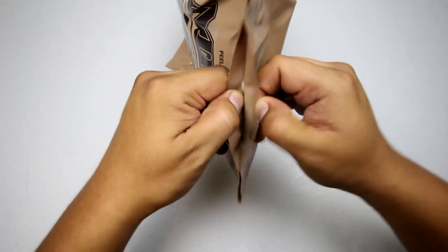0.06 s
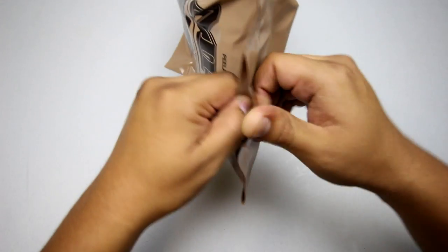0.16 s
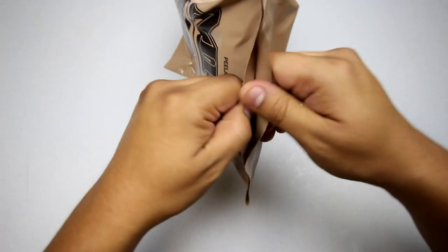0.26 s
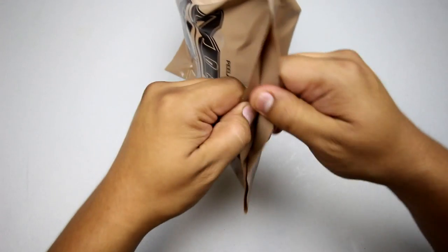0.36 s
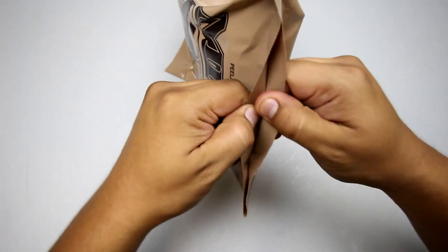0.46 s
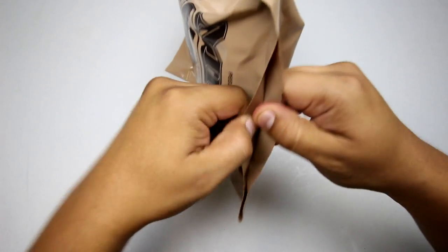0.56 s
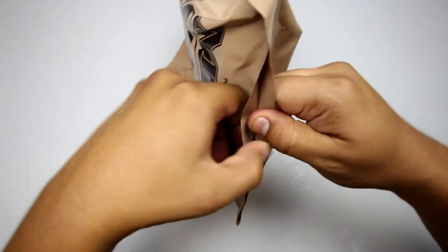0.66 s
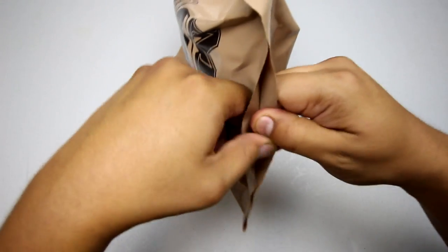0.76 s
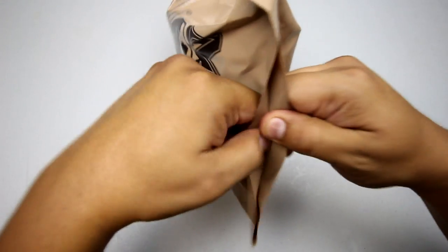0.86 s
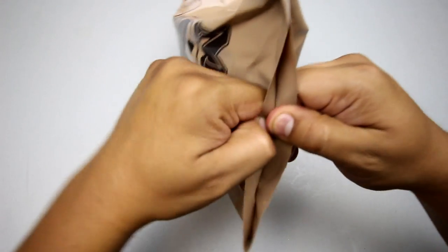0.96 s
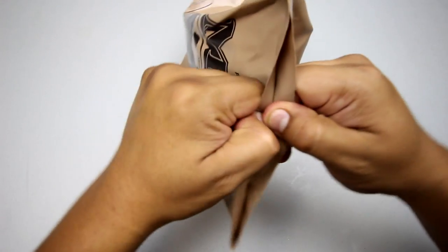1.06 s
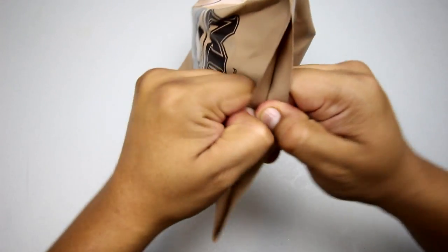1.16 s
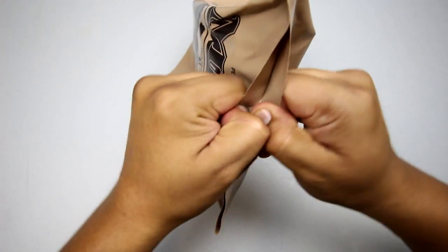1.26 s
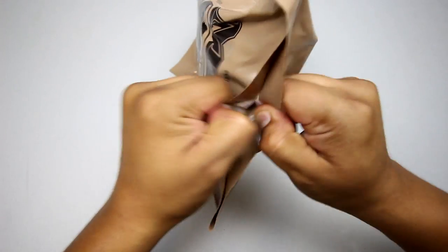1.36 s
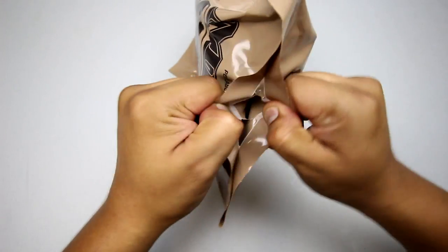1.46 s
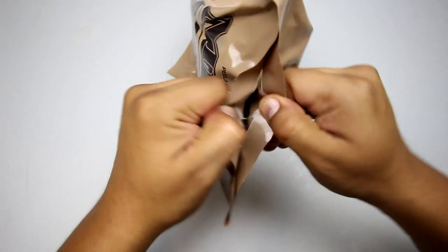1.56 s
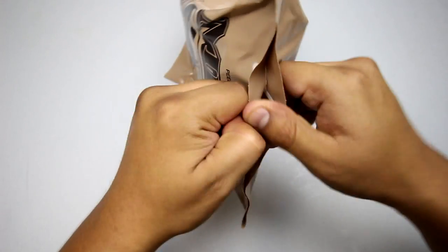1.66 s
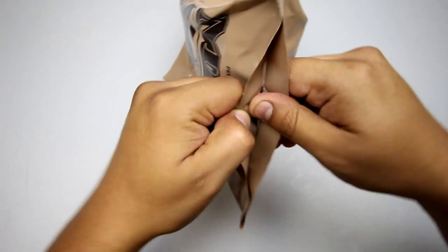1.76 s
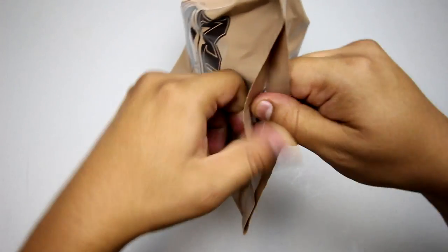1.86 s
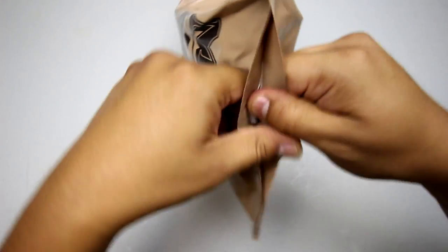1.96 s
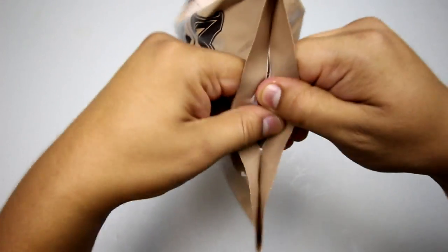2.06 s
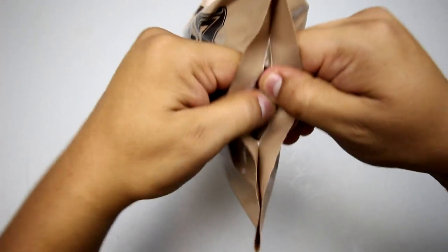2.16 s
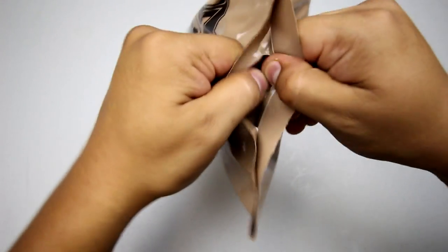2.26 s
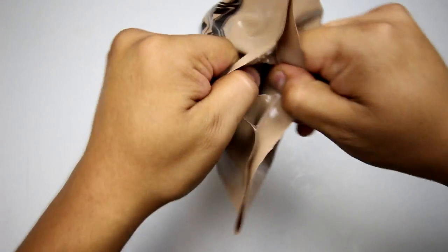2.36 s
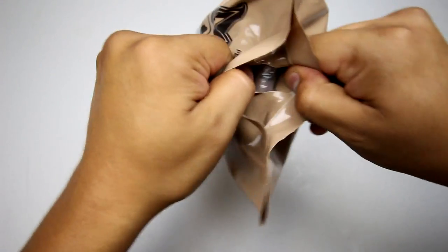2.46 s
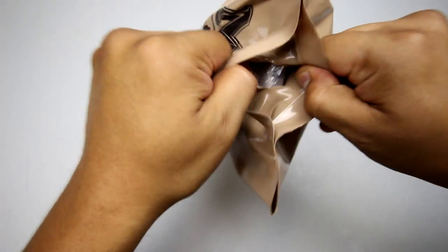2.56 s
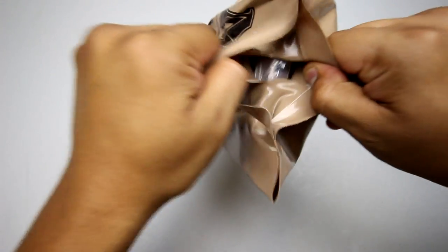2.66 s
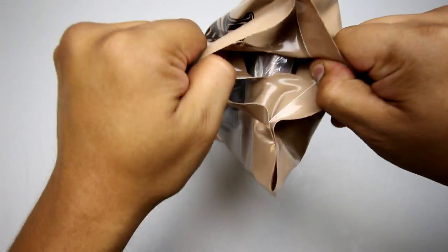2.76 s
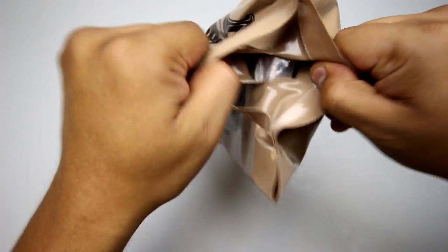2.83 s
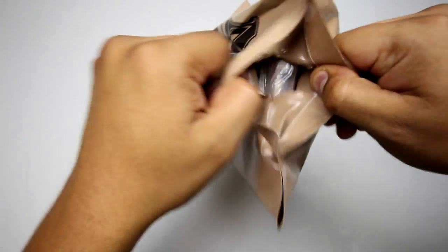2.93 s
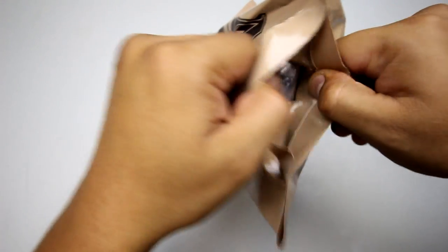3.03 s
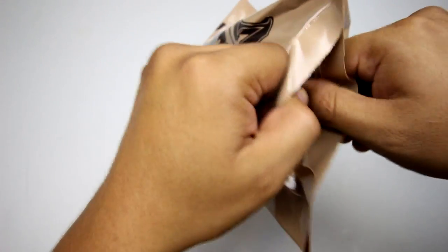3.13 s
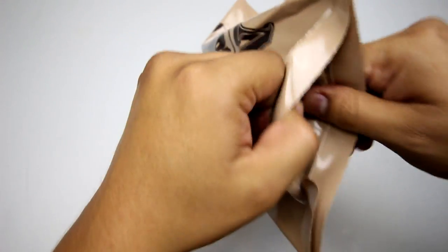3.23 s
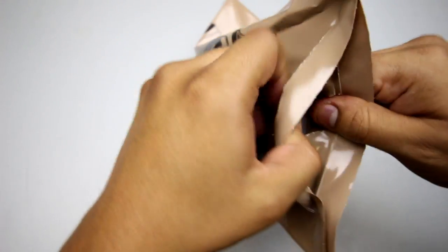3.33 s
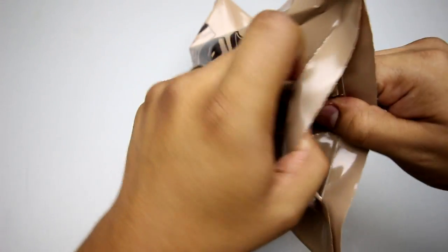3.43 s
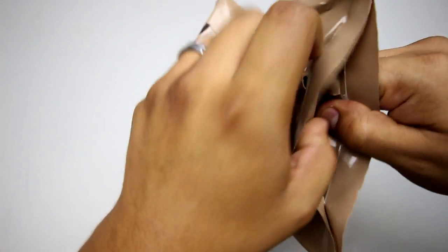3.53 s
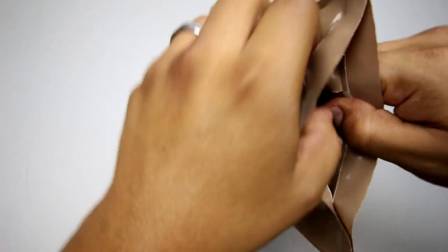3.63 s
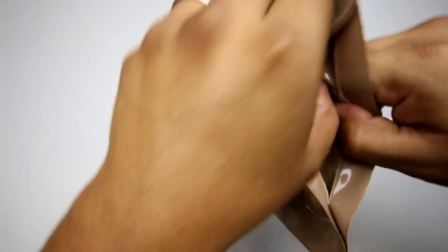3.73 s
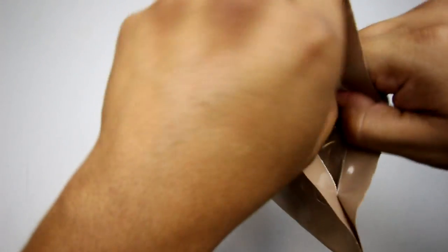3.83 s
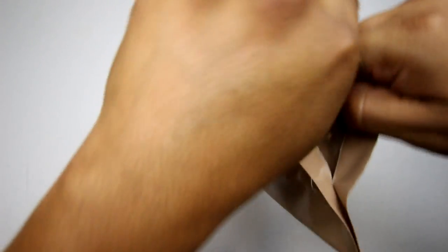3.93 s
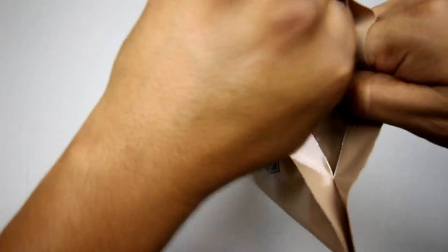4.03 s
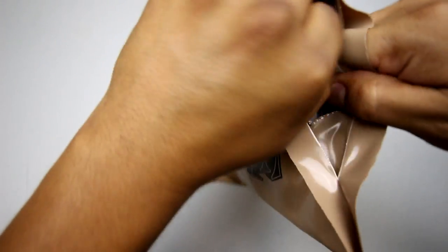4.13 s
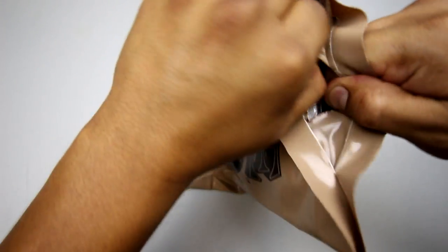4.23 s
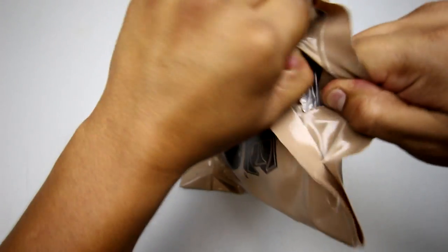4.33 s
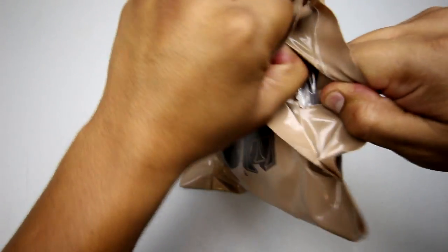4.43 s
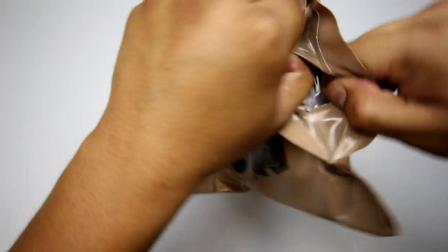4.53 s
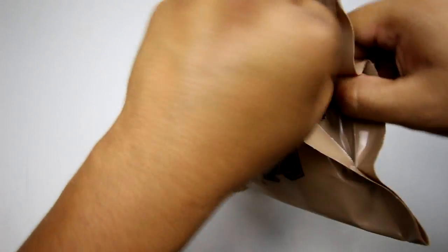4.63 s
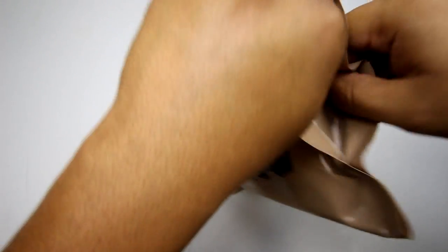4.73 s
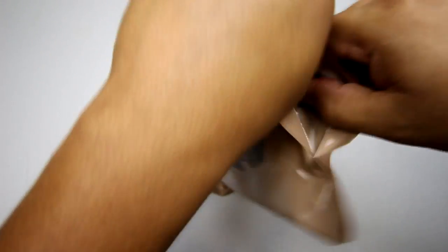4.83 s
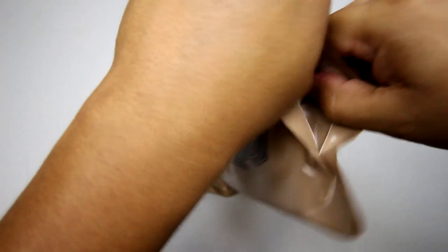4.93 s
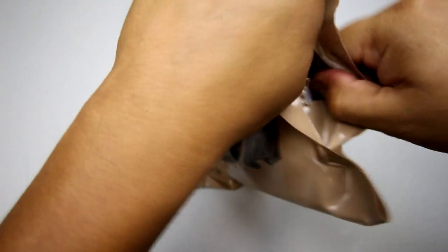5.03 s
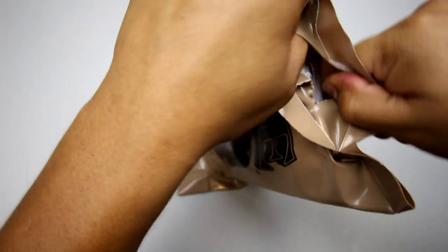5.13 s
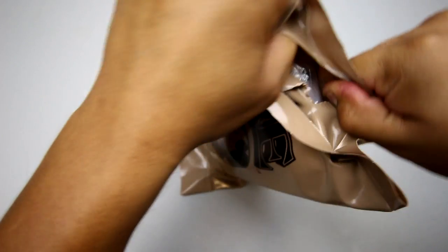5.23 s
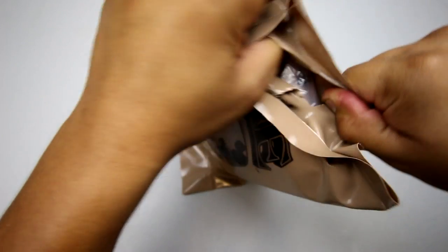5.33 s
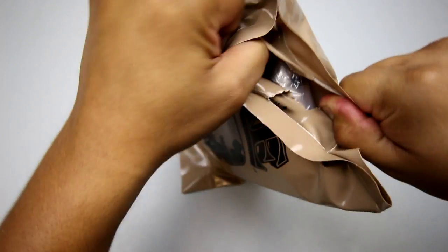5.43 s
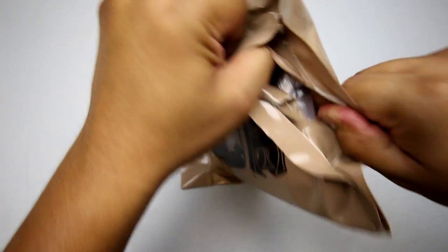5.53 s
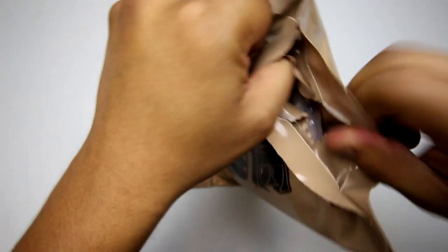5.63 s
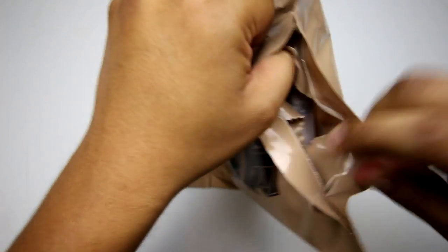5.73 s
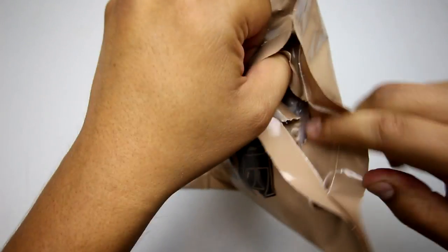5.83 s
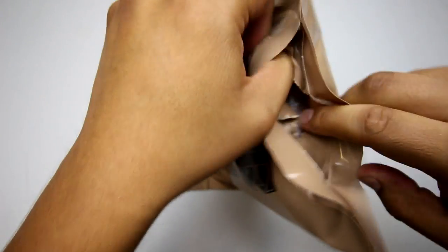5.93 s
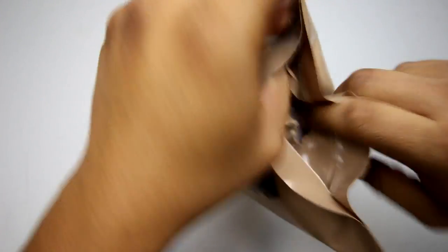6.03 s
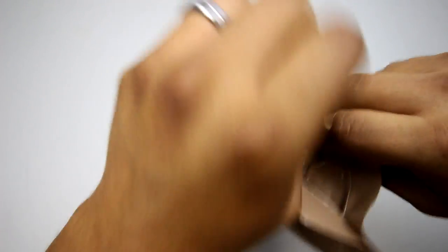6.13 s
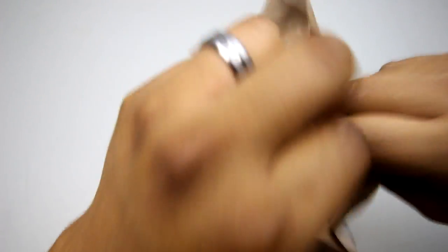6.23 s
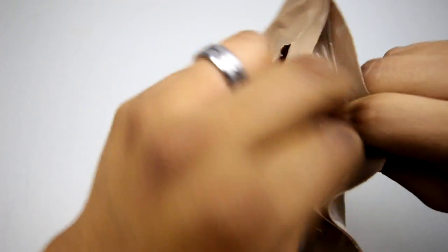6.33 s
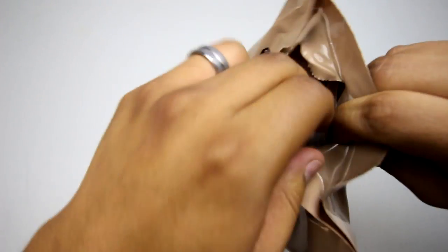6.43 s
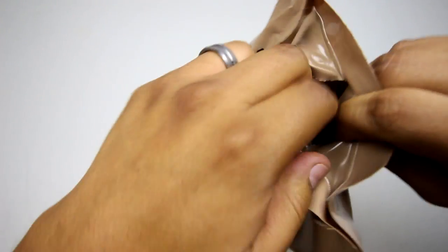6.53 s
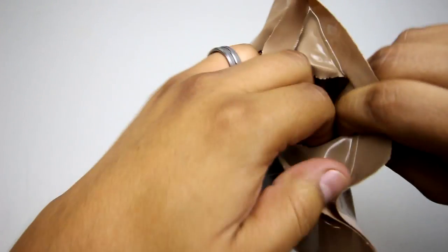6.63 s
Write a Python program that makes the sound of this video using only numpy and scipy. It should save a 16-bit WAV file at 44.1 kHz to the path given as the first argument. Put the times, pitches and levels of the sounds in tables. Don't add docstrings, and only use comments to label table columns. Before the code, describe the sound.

Close stereo handling of heavy crinkly film indoors: irregular bright cracks and duller popping folds, each short and dry with a quick hard-room echo. Snaps thicken after one second, come in isolated loud bursts through the middle, then turn into busy crumpling and rustling near the end. Low soft knocks from fingers, faint handling rumble and slight hiss lie beneath, leaning a little right.

```python
import sys
import numpy as np
from scipy import signal
from scipy.fft import rfft, irfft, next_fast_len
from scipy.io import wavfile
from scipy.ndimage import map_coordinates

SR = 44100
rng = np.random.default_rng(int(sys.argv[2]) if len(sys.argv) > 2 else 0)


def transcribe(u):
    v = np.clip(np.atleast_2d(u).T, -1, 1)
    q = np.round(v * 32767).astype(np.int16)
    wavfile.write(sys.argv[1], SR, q)


def voltage_ratio(level):
    return 10 ** (np.asarray(level, float) / 20)


N = 294588

# start in seconds, peak in dB, crease pitch in Hz,
# panel thump in dB.
FOLDS = [(0.097, -15, 1020, -3), (0.453, -22.5, 1670, -8), (0.49, -23, 820, -17), (0.694, -16, 950, -3),
         (1.09, -1.5, 985, -19), (1.363, -11, 1980, -22), (1.47, -1, 1150, -36), (1.498, 3.5, 1550, -35),
         (1.584, -4, 1530, -7.5), (1.87, -40.5, 921, 22), (1.894, -40, 834, 10), (2.771, 0, 1160, -11),
         (2.82, -11.5, 1050, -18), (3.055, -13.5, 1470, -16), (3.089, -14.5, 1980, -35),
         (3.334, -33, 730, -5), (3.723, -15, 1160, -2.5), (3.82, -3.5, 1090, -14.5), (4.728, -18, 980, -1),
         (4.807, -44, 845, 11), (4.857, 5.5, 1340, -26), (4.942, -10, 900, -25), (4.98, -19.5, 1390, -11),
         (5.179, 5, 1630, -19), (5.218, -11.5, 854, -7), (5.609, -9, 870, -20), (6.21, -16.5, 864, -7.5),
         (6.261, -11, 1560, -38)]
FOLD_SEAM_DB, FOLD_CRACK_DB, FOLD_EDGE_GROWS = -20.5, -30.5, 0.75

# start in seconds, peak in dB, crease pitch in Hz,
# panel thump in dB, seam in dB.
SEAMS = [(0.653, -26.5, 1910, -29, 2), (0.977, -20, 1490, -22, 5), (1.298, -22, 1100, -27, -4),
         (1.373, -11.5, 1520, -14, 8), (1.454, -6.5, 730, -13, 8), (1.464, -1.5, 910, -10, 0.5),
         (2.109, -19, 1470, 3.5, 4), (2.235, -21.5, 1200, -21, -1.5), (2.428, 8.5, 1260, -29.5, -11),
         (2.653, -3, 1000, -8, 6.5), (3.126, -35, 1380, 4, 8), (4.238, -27, 824, -24, 5),
         (4.371, -21.5, 1220, -39, -5), (4.489, 0, 990, -7, -2.5), (4.69, -29, 929, -10, 11.5),
         (5.489, -21, 895, -4.5, 12), (5.592, 1, 920, -19, -15.5), (5.719, -17.5, 860, -15, -8),
         (5.871, -24, 964, -12, 6), (5.999, -26, 810, 1, 4), (6.054, -8.5, 910, -11.5, -1),
         (6.143, -11, 980, -11, -4.5), (6.278, -10, 1060, -39, -14), (6.62, -8.5, 1880, -16, -2.5)]
SEAM_CRACK_DB = -50

# start in seconds, peak in dB, crease pitch in Hz,
# panel thump in dB, crack in dB.
KINKS = [(0.138, -10, 1050, -5, -10), (0.969, -8.5, 1820, -14, -4), (1.491, -5, 1300, -20, -5),
         (1.665, 1.5, 1020, -14, -7), (1.936, -12, 980, -9, -4), (2.029, -3.5, 1370, -12, 0.5),
         (2.092, -3, 1300, -21, 1), (2.153, -5.5, 1180, -15.5, -8), (2.391, -11.5, 1000, -23, -2.5),
         (2.501, -1.5, 900, -17.5, -5.5), (2.754, -7, 1350, -13, -5), (3.169, -10.5, 1470, -12, -3),
         (3.572, -14, 1530, -18, -8), (4.042, -5, 1640, -24, -4), (5.318, -15.5, 1310, -31, -22),
         (5.46, -12.5, 1660, -19.5, 1), (5.943, -13, 1460, -33, -0.5), (6.089, -9, 1160, -14, -0.5),
         (6.219, -15, 1550, -17, -1)]
KINK_SEAM_DB = -2.5

# start in seconds, peak in dB, seam in dB, crack in dB.
CRINKLES = [(0.677, -20, -22, 3), (0.813, -30, -25, -2), (0.924, -26, 14.5, 21.5), (1.036, -21, 9.5, 8),
            (1.322, -15, -10, -2.5), (1.418, -20, 8, -3), (1.837, -19.5, -2.5, -21), (2.295, -68.5, 7, 49),
            (2.372, -23.5, 4, 1), (2.924, -21.5, 8, 3.5), (2.993, -14.5, -1.5, 6), (3.255, -21, 4, 11.5),
            (3.363, -14.5, 0, 5), (3.429, -26.5, 4.5, 2), (3.46, -20.5, -1, 11.5), (3.667, -30, -12, -4),
            (3.696, -20, -5, -7), (3.796, -21.5, -2, -12), (3.993, -32.5, 8, 9.5), (4.088, -19.5, 1, 2),
            (4.215, -27.5, 8.5, 11), (4.434, -35, 6, 11), (5.005, -23.5, 3.5, 7.5),
            (5.391, -25.5, -6, 15.5), (5.439, -46, -6, -9), (6.022, -12.5, -5, 1), (6.045, -14.5, 7.5, 6.5),
            (6.544, -16, 1.5, -12), (6.6, -19.5, -7, 0), (6.671, -14.5, 5, 4)]
CRINKLE_HZ, CRINKLE_THUMP_DB = 1150, -12

# start in seconds, rip time in seconds.
RIPS = [(0.924, 0.0014), (0.969, .005), (1.036, 0.0044), (1.373, 0.0028), (1.419, 0.0079), (1.455, 0.005),
        (1.491, 0.0058), (2.373, 0.012), (2.501, 0.0025), (2.653, 0.0022), (3.169, 0.0041), (3.255, 0.0058),
        (3.572, 0.0045), (4.042, .003), (5.46, 0.0038), (5.489, 0.0033), (6.054, 0.0034)]
RIP_S = 0.0008

# start in seconds, peak in dB, pitch in Hz.
BELLY = [(0.097, -16.5, 420), (0.137, -10, 406), (0.69, -27, 310), (1.462, -1.5, 614), (1.584, -4, 415),
         (1.662, -3.5, 326), (2.09, -10.5, 580), (2.426, -14.5, 475), (2.5, -9, 501), (2.654, -12, 510),
         (2.769, -7.5, 414), (3.724, -9, 343), (3.819, -9.5, 504), (4.49, -5, 323), (5.215, -19, 415),
         (5.591, -17, 490), (6.048, -14, 233)]
FACE = [(1.09, -6, 1400), (1.464, -12, 1100), (1.496, -12, 1270), (1.583, -3, 1410), (1.662, -3, 1140),
        (1.937, -14, 896), (2.031, -9, 1210), (2.091, -11, 1250), (2.428, -1, 1180), (2.501, -21, 825),
        (2.653, -9, 815), (2.77, -0.5, 1220), (3.82, -8, 1260), (4.043, -20, 1460), (4.489, -7.5, 830),
        (4.859, -2, 1500), (5.182, -7, 1050), (5.594, -5, 910)]
GUSSET = [(1.0887, -6, 1660), (1.373, -15, 2840), (1.4561, -9, 3660), (1.662, -2, 1600), (2.0287, -7, 2270),
          (2.4287, 0, 1600), (2.654, 4, 3420), (3.1667, -14, 1650), (3.361, -1, 2320), (3.461, -8, 3830),
          (4.0397, -12.5, 1670), (4.4898, -2, 2550), (4.856, -13, 1570), (5.1786, 9, 1880),
          (5.488, -9, 3020), (5.5922, -5, 1710), (6.0467, -4, 1830)]

# start in seconds, peak in dB, pitch in Hz.
FLECKS = [(.344, -37, 4500), (.475, -24, 3040), (.63, -33, 4000), (1.013, -26, 8000), (1.207, -24, 3900),
          (1.24, -34, 4000), (2.143, -14, 4000), (2.497, 2, 2470), (2.59, -28, 7500), (2.618, -25, 8000),
          (3.044, -26, 3000), (3.134, -18, 2800), (3.171, -7, 4600), (3.303, -30, 6000), (3.375, -22, 2500),
          (3.49, -31, 5000), (3.642, -31, 5000), (3.971, -22, 4000), (4.466, -33, 6000), (4.623, -26, 4000),
          (4.871, -28, 8000), (4.894, -24, 7500), (4.911, -30, 9000), (5.356, -27.5, 3100),
          (5.441, -17, 5770), (5.493, -9, 3500), (5.499, -20, 1300), (5.532, -40, 8500), (5.576, -29, 4500),
          (6.585, -30, 5000)]

# start in seconds, peak in dB.
TICKS = [(0.1677, -13), (0.9614, -31), (0.977, -24), (0.998, -12), (1.0054, -26), (1.0314, -31),
         (1.381, -8), (1.667, -7), (2.034, -30), (2.295, -19), (2.484, -32), (2.6389, -38), (2.9766, -49),
         (3.353, -19), (3.5671, -16), (4.3, -25), (4.3974, -21), (4.7, -13), (4.808, -18), (5.2533, -16),
         (5.274, -10.5), (5.413, -19), (5.874, -17), (6.0274, -23), (6.081, -4.5), (6.323, -12),
         (6.3844, -24), (6.4674, -14), (6.606, -6.5)]

# time in seconds, pull in dB, twist in dB.
PULL = [(0, -39, -43.5), (.72, -46.5, -47), (.92, -22.5, -41), (1.1, -35.5, -47), (1.9, -38.5, -38.5),
        (2.2, -32, -29), (2.39, -46, -50), (2.75, -29, -44), (3.5, -37.5, -42.5), (3.8, -31, -35.5),
        (3.92, -43, -51), (4.18, -31, -33.5), (4.45, -38.5, -47.5), (4.69, -30.5, -35), (5.5, -39, -41),
        (5.85, -32, -35), (6.35, -26, -31), (6.68, -34, -35.5)]
SETTLE_DB, SETTLE_RISE_S, SETTLE_S = -23.5, 0.1, 0.062
FIZZ_DB, FIZZ_GROWS = -45.5, 0.66
FLAP_DB, FLAP_GROWS, FLAP_GRIP_DB = -47, 0.77, 1.5

# frequency in Hz, level in dB per Hz.
RUSTLE = [(180, -31), (300, 0), (410, -1.5), (487, -0.5), (538, -5.5), (629, -1.5), (1630, -0.5),
          (9000, -21), (11700, -33), (19800, -120)]
FIZZ = [(2650, -6), (4500, -6.5), (9770, -6), (14700, -7.5), (15700, -28), (16300, -37)]
FLAP = [(53, -42), (90, -2.5), (297, 3), (358, -2.5), (575, 4), (700, -57), (910, -28), (1540, -120)]

# middle in seconds, half length in seconds, level in dB, centre in Hz.
CRUMPLES = [(0.09, 0.042, -38, 1510), (0.196, 0.027, -30.5, 3500), (0.356, 0.029, -36.5, 4600),
            (0.464, 0.031, -32.5, 2330), (0.665, 0.023, -33, 2500), (0.906, 0.059, -32, 1830),
            (1.43, 0.012, -25, 3500), (2.546, 0.0055, -26, 5960), (2.994, 0.013, -43, 2500),
            (3.815, 0.057, -33, 6000), (4.02, 0.047, -32, 3500), (4.632, 0.06, -28.5, 2660),
            (4.703, 0.011, -24.5, 9000), (4.912, 0.024, -33, 8000), (5.055, 0.042, -34, 2950),
            (5.672, 0.012, -27.5, 2470), (5.724, 0.045, -33, 3900), (5.831, 0.093, -31, 2450),
            (5.777, 0.0092, -23, 3020), (6.048, 0.013, -19, 2440), (6.262, 0.038, -24, 3070),
            (6.325, 0.032, -20, 3100), (6.423, 0.088, -33.5, 2500), (6.627, 0.017, -28, 7000)]

# start in seconds, peak in dB, pitch in Hz.
KNOCKS = [(0.157, -27, 133), (0.687, -30, 194), (.83, -35, 138), (0.966, -27, 139), (1.006, -28, 160),
          (1.089, -23.5, 181), (1.33, -35, 130), (1.471, -19, 173), (1.664, -21, 141), (2.031, -34, 151),
          (2.147, -27, 134), (2.663, -18.5, 180), (2.772, -13, 256), (3.018, -27, 173), (3.038, -29, 110),
          (3.125, -22.5, 234), (3.173, -22, 142), (4.129, -29, 262), (4.216, -24.5, 240),
          (4.491, -9.5, 325), (4.646, -19.5, 236), (4.727, -30.5, 167), (5.1, -26.5, 161),
          (5.146, -21.5, 176), (5.595, -22.5, 189), (6.045, -17, 202)]

# middle in seconds, half length in seconds, rumble in dB.
GRIPS = [(.11, 0.077, -45), (0.944, 0.093, -39), (1.46, 0.12, -40.5), (2.087, 0.13, -46),
         (2.504, 0.024, -45), (3.096, 0.16, -44.5), (4.75, 0.13, -50), (5.143, 0.066, -41),
         (5.787, 0.026, -38.5), (6.3, 0.33, -55)]

# frequency in Hz, level in dB per Hz.
RUMBLE = [(8.8, -38), (15, -60), (43, 11.5), (87, -8), (130, 10), (170, 5.5), (290, -120)]
ROOM_RUMBLE_DB = -54.5

# time in seconds, left level over right in dB.
PLACE = [
    (0.0, -3),
    (2.77, -3.5),
    (3.37, -4.5),
    (5.19, -3),
    (5.86, -4.5),
    (6.68, -4.5),
]
LEFT_DB = -3

# frequency in Hz, likeness from 0 to 1.
ALIKE = [(60, 0.79), (180, 0.62), (550, 0.91), (1650, 0.77), (4970, 0.13), (15000, 0.021)]

# frequency in Hz, time to fall by 60 dB in seconds.
ROOM = [(150, 0.15), (500, 0.35), (2000, 0.24), (5000, 0.38), (12000, 0.19)]

# delay in seconds, level in dB.
TABLE = [
    (.0021, -11),
    (.0036, -13),
    (0.0145, -19),
]
SHUDDER_DB, WET_DB = -9.5, -4.5
HISS_DB = -68


def snaps():
    s, db, hz, thump_db, seam_db, crack_db = creases()
    scatter = rng.standard_normal((len(s), 4))
    panel_hz = 330 * np.exp(0.24 * scatter[:, 0])
    seam_hz = 3100 * np.exp(0.016 * scatter[:, 1])
    crack_hz = 6800 * np.exp(0.37 * scatter[:, 2])
    panel = voltage_ratio(db + thump_db + 2.0)[:, None] * bursts(panel_hz, q=1.12)
    fold = voltage_ratio(db + 0.5)[:, None] * bursts(hz, q=0.93)
    seam = voltage_ratio(db + seam_db + 5.5)[:, None] * bursts(seam_hz, q=1.22)
    crack = voltage_ratio(db + crack_db + 5.5)[:, None] * bursts(crack_hz, q=0.77)
    edge = ripped(s, seam - crack)
    return place(s, panel - fold + edge, 0.18 * scatter[:, 3], count=8)


def creases():
    slower = FOLD_EDGE_GROWS - 1
    rows = []
    for s, db, hz, thump in FOLDS:
        rows.append((s, db, hz, thump, FOLD_SEAM_DB + slower * db, FOLD_CRACK_DB + slower * db))
    for s, db, hz, thump, seam in SEAMS:
        rows.append((s, db, hz, thump, seam, seam + SEAM_CRACK_DB))
    for s, db, hz, thump, crack in KINKS:
        rows.append((s, db, hz, thump, crack + KINK_SEAM_DB, crack))
    for s, db, seam, crack in CRINKLES:
        rows.append((s, db, CRINKLE_HZ, CRINKLE_THUMP_DB, seam, crack))
    return np.transpose(sorted(rows))


def ripped(s, rows):
    rip_s = np.full(len(s), RIP_S)
    for when, length_s in RIPS:
        nearest = np.abs(s - when).argmin()
        rip_s[nearest] = length_s
    fade = np.exp(-np.arange(2048) / SR / rip_s[:, None])
    slips = rng.standard_normal(rows.shape) ** 3 * fade
    slips[:, 0] = 22
    slips /= np.linalg.norm(slips, axis=1, keepdims=True)
    return signal.fftconvolve(rows, slips, axes=1)[:, :2048]


def taut_faces():
    belly = tuned(BELLY, under_db=-6, q=3.38)
    face = tuned(FACE, under_db=-6.5, q=6)
    gusset = tuned(GUSSET, under_db=-14.5, q=6.8)
    return belly - face - gusset


def flecks():
    return tuned(FLECKS, under_db=-5.5, q=3.0)


def pops(count):
    draw = rng.random((count, 3))
    when = draw[:, 0] * (N / SR - 0.01)
    pull_db = effort()[(when * SR).astype(int)]
    db = pull_db + 1.5 + 9 * draw[:, 1] ** 2
    hz = 900 * 9 ** draw[:, 2]
    return place(when, voltage_ratio(db)[:, None] * bursts(hz, q=1.7), np.zeros(count), count=8)


def ticks():
    s, db = np.transpose(TICKS)
    scatter = rng.standard_normal((len(s), 2))
    hz = 9000 * np.exp(0.084 * scatter[:, 0])
    rows = voltage_ratio(db + 1.0)[:, None] * bursts(hz, q=1.47)
    return place(s, rows, 3.9 * scatter[:, 1], count=8)


def film():
    twist_db = curves(PULL)[1]
    twist_db = twist_db - twist_db.mean()
    rustle_gain = voltage_ratio(effort() - 3.0)
    fizz_gain = voltage_ratio(FIZZ_DB + FIZZ_GROWS * twist_db)
    flap_gain = np.hypot(voltage_ratio(FLAP_DB + FLAP_GROWS * twist_db), voltage_ratio(FLAP_GRIP_DB) * grip())
    rustle = rustle_gain * spread(crackle(2500, scatter_db=6.0, smooth=2.04, clump_db=1.87), RUSTLE)
    fizz = fizz_gain * spread(crackle(1500, scatter_db=-5.0, smooth=1.4, clump_db=1.0), FIZZ)
    flap = flap_gain * spread(crackle(300, scatter_db=3.5, smooth=0.71, clump_db=1.5), FLAP)
    return (rustle + fizz + flap + crumples()) * voltage_ratio([[LEFT_DB / 2], [-LEFT_DB / 2]])


def effort():
    s, db = creases()[:2]
    t = np.arange(SR // 2) / SR
    jolts = np.bincount(np.round(s * SR).astype(int), voltage_ratio(db + SETTLE_DB) ** 2, N)
    swell = (1 - np.exp(-t / SETTLE_RISE_S)) ** 2 * np.exp(-t / SETTLE_S)
    settling = signal.fftconvolve(jolts, swell)[:N]
    pull = voltage_ratio(curves(PULL)[0])
    return 10 * np.log10(pull ** 2 + np.abs(settling))


def crackle(per_s, scatter_db, smooth, clump_db):
    clumps = voltage_ratio(clump_db * wobble(25) + clump_db * wobble(90))
    sizes = voltage_ratio(scatter_db * rng.exponential(size=N).clip(0, 3))
    slips = (rng.random(N) < per_s / SR) * sizes
    rough = unit(slips * rng.standard_normal((2, N)))
    return clumps * (rough + smooth * rng.standard_normal((2, N)))


def crumples():
    flat = [(100, 0), (16000, 0)]
    slips = spread(crackle(4000, scatter_db=-3.0, smooth=1.0, clump_db=4.0), flat)
    t, out = np.arange(N) / SR, np.zeros((2, N))
    for s, half_s, db, hz in CRUMPLES:
        near = np.abs(t - s) < 3 * half_s
        fold = unit(filtered(slips[:, near], lambda f: resonance(f, hz, q=0.74) ** 2))
        swell = np.exp(-((t[near] - s) / half_s) ** 2)
        out[:, near] += voltage_ratio(db) * swell * fold
    return out


def knocks():
    s, db, hz = np.transpose(KNOCKS)
    f = np.fft.rfftfreq(2048, 1 / SR)
    rows = irfft(resonance(f, hz[:, None], q=1.18) ** 2, 2048)
    rows *= voltage_ratio(db)[:, None] / np.abs(rows).max(axis=1, keepdims=True)
    return place(s, rows, np.zeros(len(s)), count=1)[0]


def grip():
    t = np.arange(N) / SR
    power = np.zeros(N)
    for s, half_s, db in GRIPS:
        power += voltage_ratio(2 * db) * np.exp(-((t - s) / half_s) ** 2)
    return np.sqrt(power)


def rumble():
    level = np.hypot(voltage_ratio(ROOM_RUMBLE_DB), grip())
    return level * voltage_ratio([[-1.8], [1.8]]) * spread(rng.standard_normal((2, N)), RUMBLE)


def room(groups, shudder_db, wet_db):
    noise = rng.standard_normal((2, len(groups), 2, SR * 5 // 8))
    hz, t, z = signal.stft(noise, SR, nperseg=128)
    turn = np.arccos(np.clip(along(ALIKE, hz), -1, 1))[:, None] / 2
    mid = z[:, :, :1] * np.cos(turn)
    side = z[:, :, 1:] * np.sin(turn) * 0.67
    z = np.concatenate([mid + side, mid - side], axis=2)
    z[1] *= voltage_ratio(-60 * t / along(ROOM, hz)[:, None])
    z[0] /= np.hypot(1, hz / 5000)[:, None]
    shudder, tail = signal.istft(z, SR, nperseg=128)[1]
    t = np.arange(tail.shape[-1]) / SR
    shudder = shudder * np.exp(-(t / 0.004) ** 2)
    tail = tail * (1 - np.exp(-t / 0.003))
    shudder = shudder / np.linalg.norm(shudder, axis=2, keepdims=True)
    tail = tail / np.linalg.norm(tail, axis=2, keepdims=True)
    answer = voltage_ratio(shudder_db) * shudder + voltage_ratio(wet_db) * tail
    for delay_s, db in TABLE:
        lags = delay_s * SR * rng.normal(1, 0.08, (len(groups), 1))
        lags = lags + rng.normal(0, 0.28, (len(groups), 2))
        for (group, port), lag in np.ndenumerate(np.round(lags).astype(int)):
            answer[group, port, lag] += voltage_ratio(db)
    answer[..., 0] = 1
    m = next_fast_len(N + answer.shape[-1])
    return irfft((rfft(groups, m) * rfft(answer, m)).sum(axis=0), m)[:, :N]


def bursts(hz, q):
    f = np.fft.rfftfreq(2048, 1 / SR) + 1
    small = 1 / (1 - 1j * 170 / f) ** 2
    rows = irfft(small * resonance(f, hz[:, None], q) ** 2, 2048)
    return rows / np.abs(rows).max(axis=1, keepdims=True)


def tuned(rows, under_db, q):
    s, db, hz = np.transpose(rows)
    return place(s, voltage_ratio(db + under_db)[:, None] * bursts(hz, q), np.zeros(len(s)), count=8)


def place(s, rows, scatter_db, count):
    pan_db = np.interp(s, *np.transpose(PLACE)) + scatter_db
    out = np.zeros((count, 2, N + 2048))
    starts = np.round((s + 0.0008) * SR).astype(int)
    for k, start in enumerate(starts):
        sides = voltage_ratio(np.array([[0.5], [-0.5]]) * pan_db[k])
        out[k % count, :, start:start + 2048] += rows[k] * sides
    return out[..., :N]


def spread(pair, spectrum):
    def colour(hz):
        turn = np.arccos(np.clip(along(ALIKE, hz), -1, 1)) / 2
        return voltage_ratio(along(spectrum, hz)) * [np.cos(turn), np.sin(turn)]

    mid, side = filtered(pair, colour)
    return unit(np.array([mid + side, mid - side]))


def resonance(f, hz, q):
    damping = 1j * f * hz / q
    return damping / (hz * hz - f * f + damping)


def filtered(x, response):
    m = next_fast_len(x.shape[-1] + 8192)
    shaped = rfft(x, m) * response(np.fft.rfftfreq(m, 1 / SR))
    return irfft(shaped, m)[..., :x.shape[-1]]


def along(points, hz):
    f, v = np.transpose(points)
    return np.interp(np.log(hz + 1), np.log(f + 1), v)


def curves(rows):
    s, *cols = np.transpose(rows)
    return [np.interp(np.arange(N) / SR, s, c) for c in cols]


def wobble(rate):
    knots = rng.standard_normal(int(N * rate / SR) + 4)
    return map_coordinates(knots, [np.arange(N) * rate / SR])


def unit(x):
    return x / np.sqrt(np.mean(x ** 2) + 1e-20)


def scene():
    jolts = snaps() + taut_faces() + flecks() + pops(count=500) + ticks()
    return room(jolts, shudder_db=SHUDDER_DB, wet_db=WET_DB) + film() + knocks() + rumble()


def top_cut(x):
    return signal.sosfilt(signal.butter(12, 15700, fs=SR, output="sos"), x)


def record(dry):
    heard = filtered(dry, lambda hz: 1 / (1 + 1j * hz / 13000) ** 3)
    heard = heard + voltage_ratio(HISS_DB) * rng.standard_normal(dry.shape)
    overload = np.abs(heard / 1.01) ** 24
    mix = heard / (1 + overload) ** (1 / 24)
    return top_cut(mix)


dry = scene()
out = record(dry)
transcribe(out)
```